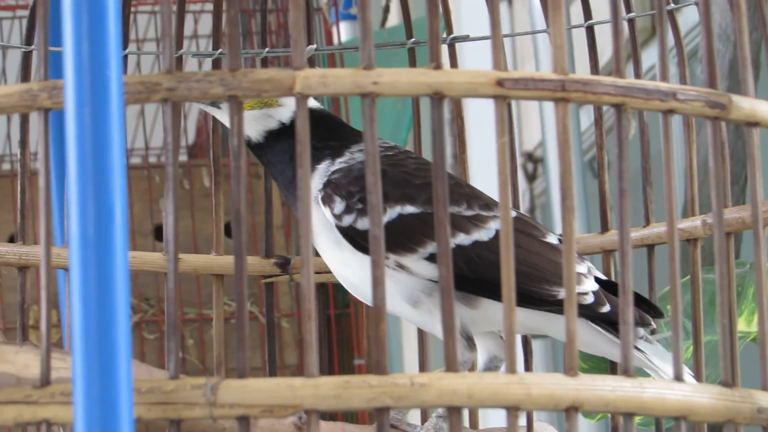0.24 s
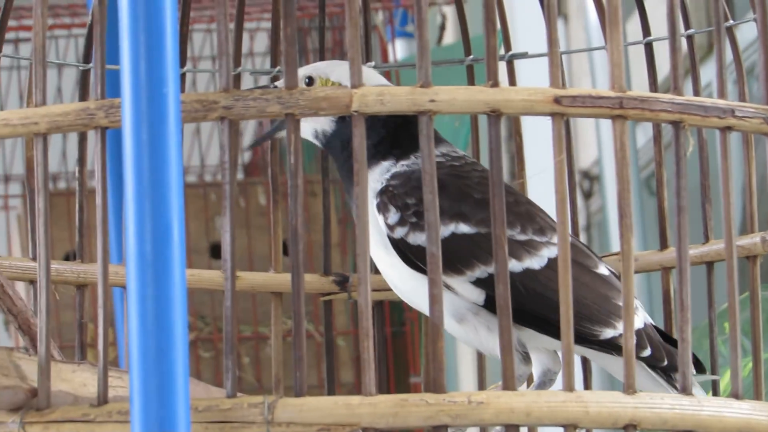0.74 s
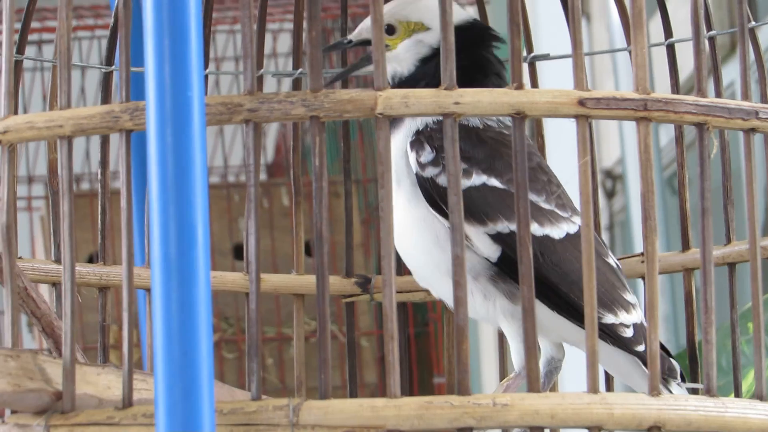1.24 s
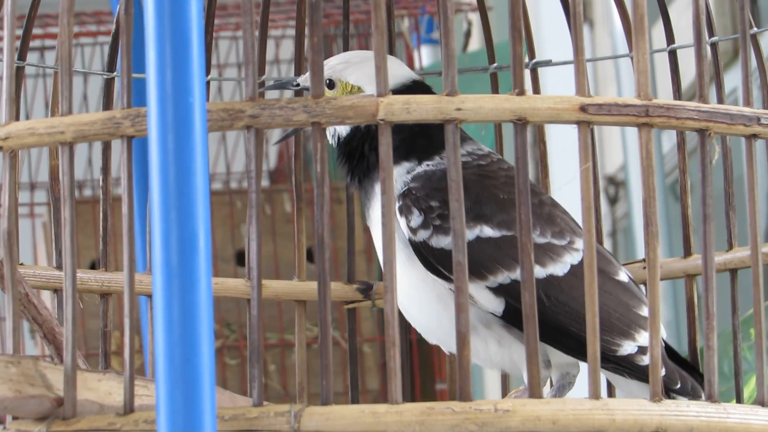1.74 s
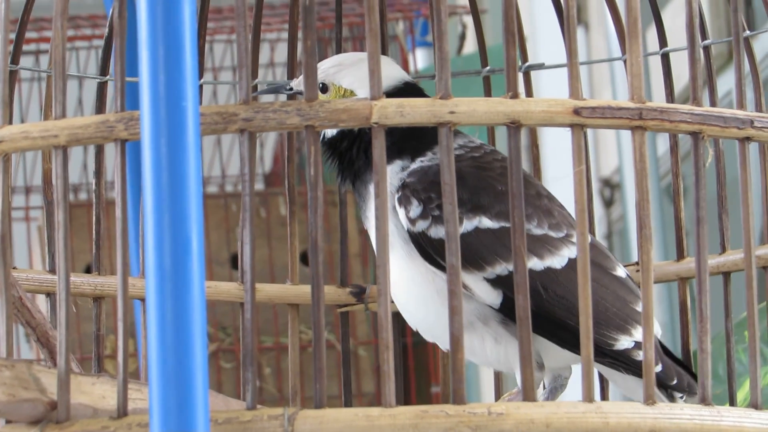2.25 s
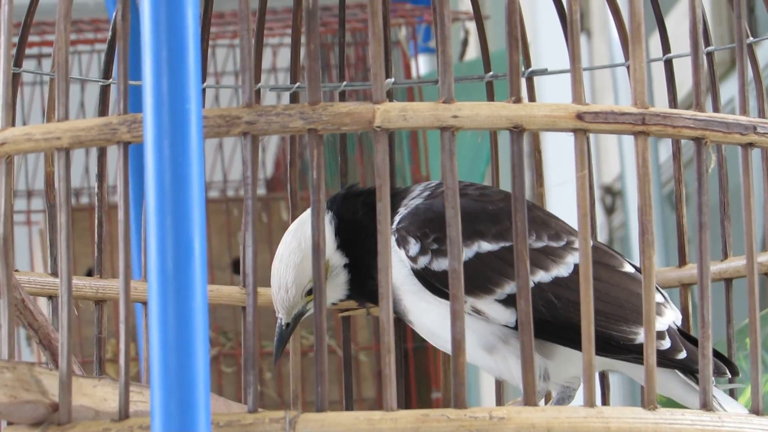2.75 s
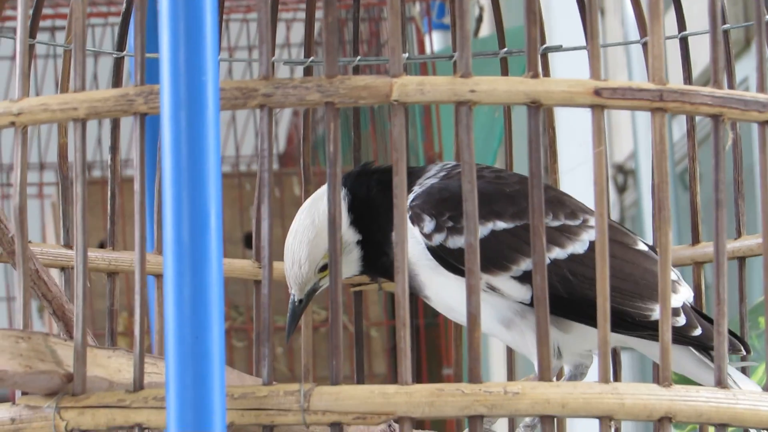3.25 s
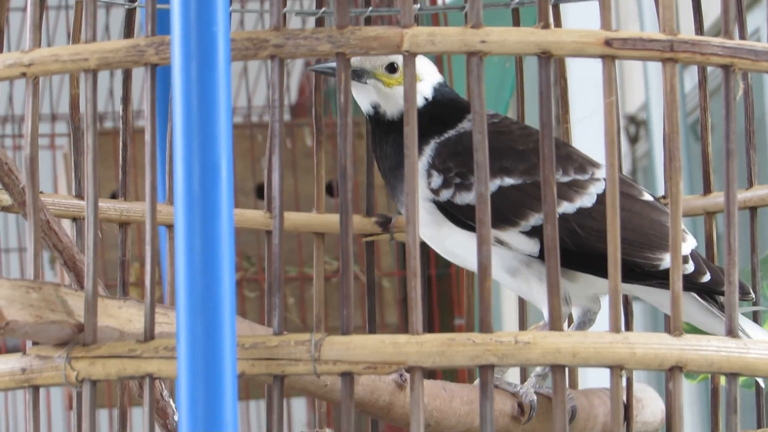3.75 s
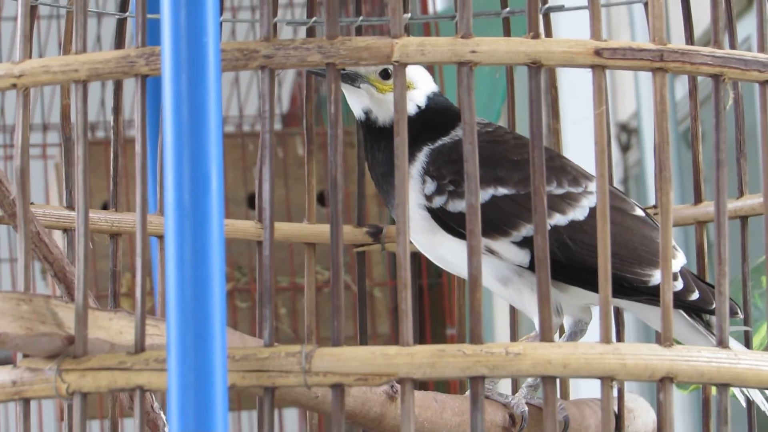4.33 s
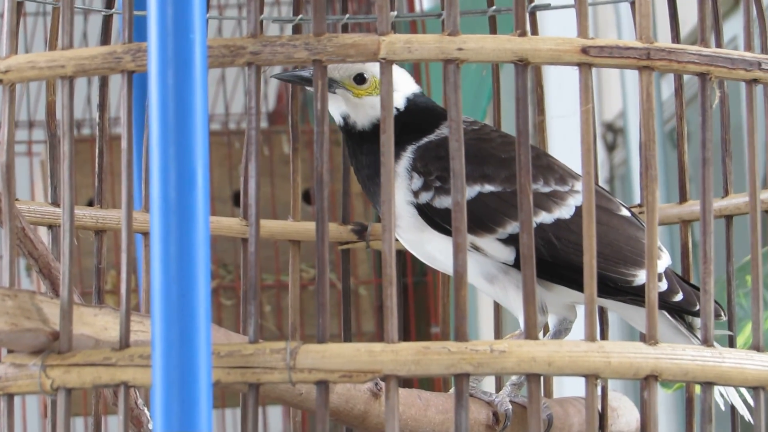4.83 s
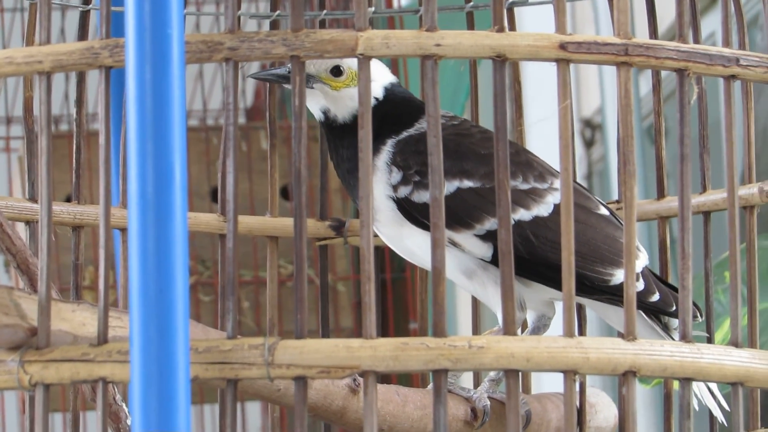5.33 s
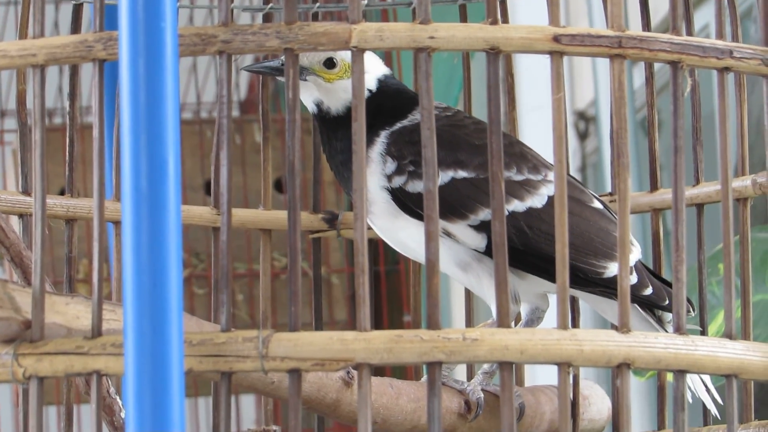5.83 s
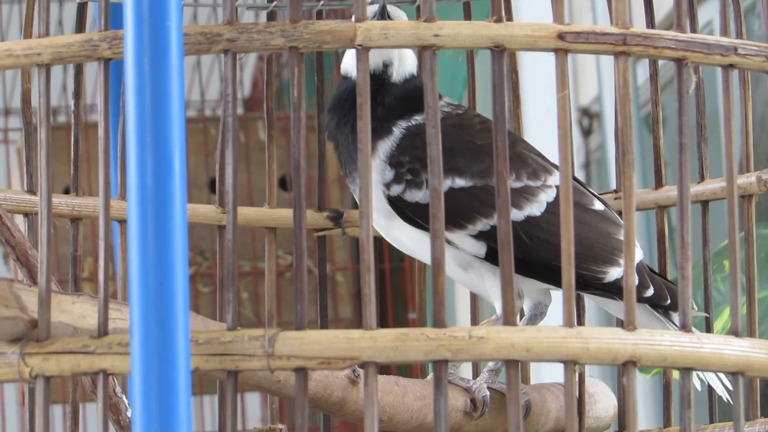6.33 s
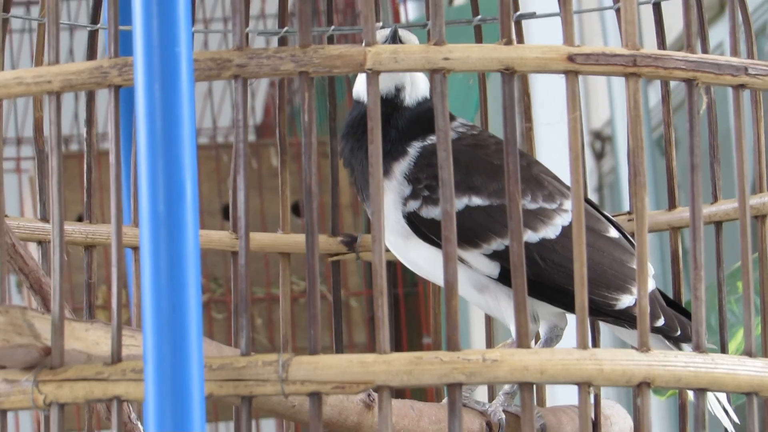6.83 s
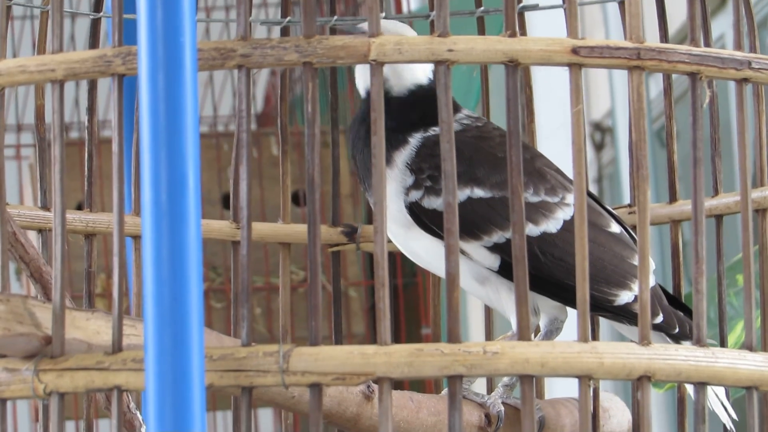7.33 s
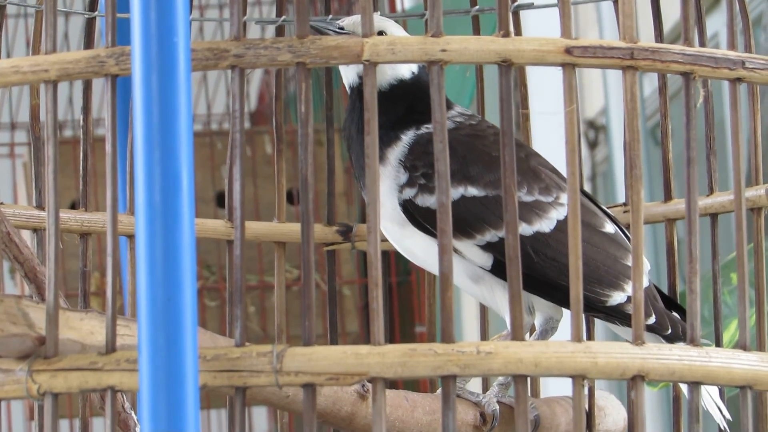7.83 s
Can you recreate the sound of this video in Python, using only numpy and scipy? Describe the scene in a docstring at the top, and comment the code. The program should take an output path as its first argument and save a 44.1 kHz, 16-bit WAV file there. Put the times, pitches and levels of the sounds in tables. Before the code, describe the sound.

A caged starling belts two loud, piercing whistle-and-squawk phrases, then scattered quiet chirps and rasps, while a low engine drone slowly swells beneath.

```python
"""A caged starling sings whistles, chirps and rasping squawks in a hard-walled, echoing place.
Each voice is a jittered harmonic series plus leaking air, heard directly and through echoes.
An engine drone of pure tone sinks in pitch and swells over a throb and a traffic-like rumble,
moan, gusts and hiss of coloured noise; a limiter ducks the bird and background after the two
loudest phrases, over steady circuit noise."""
import sys
import numpy as np
from scipy import signal
from scipy.fft import rfft, irfft, next_fast_len
from scipy.io import wavfile
from scipy.ndimage import uniform_filter1d

SR = 44100
rng = np.random.default_rng(int(sys.argv[2]) if len(sys.argv) > 2 else 0)


def to_wav(s):
    """Save 16-bit WAV."""
    ch = np.atleast_2d(s).T  # columns
    pcm = np.round(np.clip(ch, -1, 1) * 32767)  # PCM
    wavfile.write(sys.argv[1], SR, pcm.astype(np.int16))


N = 355887

# hiss spectrum: (frequency [Hz], relative density [dB per Hz])
HISS_SPECTRUM = [(880, -9.5), (1500, -6.5), (2850, -10.5), (3650, -9), (3940, -10.5), (4770, -8),
                 (11100, -8), (14700, -22)]
HISS_PATCHY_DB = 0.9


def gain_of(db):
    """Decibels to amplitude."""
    return 10 ** (np.asarray(db) / 20)


def evened(x):
    """Scales to rms 1."""
    return x / np.sqrt(np.mean(x ** 2) + 1e-20)


def read(points, hz, column=1):
    """One column of a frequency table, interpolated on a log-frequency axis."""
    table = np.transpose(points)
    return np.interp(np.log(hz + 1), np.log(table[0] + 1), table[column])


def along(points):
    """A (time, value) curve at every sample."""
    return np.interp(np.arange(N) / SR, *np.transpose(points))


def add(mix, start_s, sound):
    """Mixes a sound in at a time."""
    part = mix[round(start_s * SR):][:len(sound)]
    part += sound[:len(part)]


def wobble(size, period_s):
    """Random drift of rms 1 that changes over about period_s: white noise smoothed twice."""
    width = max(round(period_s * SR), 1)
    smooth = uniform_filter1d(rng.standard_normal(size), width)
    return evened(uniform_filter1d(smooth, width))


def pair(a, b, likeness):
    """Left and right spectra with the given correlation, from independent spectra a and b."""
    likeness = np.clip(likeness, -1, 1)[:, None]
    return np.array([a, likeness * a + np.sqrt(1 - likeness ** 2) * b])


def noise(spectrum, patchy_db):
    """Two-channel noise of rms 1: random spectra coloured, with patches drifting in time and frequency."""
    # background stereo image: (frequency [Hz], left-right likeness [-1 to 1])
    likeness = [(25, -0.8), (55, -0.11), (80, -0.95), (130, 0.92), (290, 0.75), (700, 0.72), (3000, 0.47),
                (6500, 0.46), (10000, 0.41), (14300, -0.052)]
    # background balance: (frequency [Hz], left minus right [dB])
    lean = [(60, 0), (180, .5), (540, -2), (1600, -1), (4780, 2), (14300, 0)]
    # background phase: (frequency [Hz], left lead [rad])
    lead = [(100, 0.5), (780, -.5), (2150, 0.5), (5000, -0.2), (7200, 0.5), (10000, 4.5), (14500, -2.5)]
    frames = N // 512 + 5
    hz = np.fft.rfftfreq(2048, 1 / SR)
    a, b, c, d, patches = rng.standard_normal((frames, len(hz), 5)).T
    patches = uniform_filter1d(patches, 6, 0)
    patches = evened(uniform_filter1d(patches, 14, 1))
    z = pair(a + 1j * b, c + 1j * d, read(likeness, hz))
    z *= gain_of(read(spectrum, hz)[:, None] + patchy_db * patches)
    z[0] *= (gain_of(read(lean, hz)) * np.exp(1j * read(lead, hz)))[:, None]
    return evened(signal.istft(z, nperseg=2048, noverlap=1536)[1][:, :N])


def hum(rows, waver_db, right_lead_cycles):
    """A low sine with drifting pitch and wavering level, its right side ahead in phase."""
    s, hz, db = np.transpose(rows)
    t = np.arange(N) / SR
    drifting_hz = np.interp(t, s, hz) + 0.5 * wobble(N, 0.05)
    cycles = np.cumsum(drifting_hz) / SR
    level = gain_of(np.interp(t, s, db) + waver_db * wobble(N, 0.09))
    return np.sqrt(2) * level * np.sin(2 * np.pi * (cycles + np.array([[0], [right_lead_cycles]])))


def engine_drone():
    """The engine's tone: one sine on a curve of pitch and level."""
    # drone: (time [s], pitch [Hz], level [dB])
    drone_curve = [(0, 117, -45.5), (.6, 120.5, -44), (1.3, 119.3, -30.5), (2.0, 116.4, -37),
                   (2.58, 115, -30.5), (2.85, 115, -43), (3.42, 112.9, -34.5), (3.65, 112.5, -44),
                   (3.9, 112.3, -35), (4.55, 111.4, -30.5), (5.08, 111.2, -32.5), (5.55, 110, -26),
                   (6.05, 108, -21.5), (6.7, 107.6, -15), (7.3, 106.2, -19.5), (7.64, 105.8, -16.5),
                   (7.79, 104.8, -21.5), (8.07, 105.3, -15)]
    left_minus_right_db = 1
    sides = gain_of(np.array([[0.5], [-0.5]]) * left_minus_right_db)
    return hum(drone_curve, 0.23, 0.02) * sides


def throb():
    """A lower sine that fades away."""
    # throb: (time [s], pitch [Hz], level [dB])
    throb_curve = [(0, 38.5, -34.5), (1.0, 41.5, -31.5), (1.5, 44, -31), (1.9, 43, -34),
                   (2.2, 39.24, -27.5), (2.6, 40.3, -30), (3.2, 43, -70)]
    return hum(throb_curve, 1.4, 0.018)


def rumble():
    """Traffic-like rumble: mostly low noise that swells."""
    # rumble spectrum: (frequency [Hz], relative density [dB per Hz])
    spectrum = [(32, -38), (55, -8.5), (78, -6), (112, -4.5), (133, -18.5), (156, -11), (231, -15.5),
                (286, -19.5), (591, -20), (3800, -49), (4940, -99), (8360, -120)]
    # rumble: (time [s], level [dB])
    level_db = [(0, -35), (1.3, -33), (3.0, -35), (4.6, -27.5), (5.0, -29), (6.2, -29), (6.72, -23.5),
                (7.2, -29.5), (7.75, -24.5), (8.07, -27)]
    return gain_of(along(level_db)) * noise(spectrum, patchy_db=1.5)


def hiss():
    """Distant hiss: smooth noise at a steady level."""
    return gain_of(-43.5) * noise(HISS_SPECTRUM, HISS_PATCHY_DB)


def moan():
    """A band of patchy noise, narrow enough to suggest a pitch."""
    # moan spectrum: (frequency [Hz], relative density [dB per Hz])
    spectrum = [(200, -34), (240, -6), (270, -10.5), (310, 1.5), (345, -3.5), (420, -39.5)]
    # moan: (time [s], level [dB])
    level_db = [(0, -39), (1.3, -42.5), (2.8, -47), (4.5, -37), (4.85, -55)]
    return gain_of(along(level_db)) * noise(spectrum, patchy_db=3.5)


def syrinx_voice(rows):
    """A membrane in the syrinx vibrates; irregular cycles smear the overtones, flutter and leak air."""
    # windpipe and beak resonances: (frequency [Hz], gain [dB])
    beak = [(1200, 8), (2000, 0.5), (3300, 5.5), (5000, 5), (7000, 4), (9500, 2), (12500, -6),
            (15000, -15.5)]
    s, *columns = np.transpose(rows)
    t = np.arange(s[0], s[-1], 1 / SR)
    hz, effort_db, tilt_db, rasp = (np.interp(t, s, c) for c in columns)
    rasp = abs(rasp)
    quick, slow = wobble(len(t), 0.00073), wobble(len(t), 0.00373)
    jitter = rasp * (0.78 * quick + 0.65 * slow)
    cycles = np.cumsum(hz * (1 + jitter)) / SR

    k = np.arange(1, 12)[:, None]  # harmonic number
    level = gain_of(tilt_db * np.log2(k) ** 0.65 + read(beak, k * hz)) * (k * hz < 16000)
    tone = (level * np.sin(2 * np.pi * k * cycles)).sum(0)
    tone /= np.sqrt((level ** 2).sum(0) / 2)

    air_band = signal.butter(3, [1500, 13000], "band", fs=SR, output="sos")
    air = signal.sosfilt(air_band, rng.standard_normal(len(t)))
    leak = np.minimum(14 * rasp, 1.5) * gain_of(5.0 * np.minimum(tilt_db, 0))  # bright, raspy voices hiss most
    voice = (tone + leak * air) / np.sqrt(1 + leak ** 2)

    depth = np.minimum(16 * rasp, 1.1)  # of the quick buzz
    pulsing = np.minimum(45 * rasp, 0.5) * wobble(len(t), 0.004)
    flutter = (1 + depth * wobble(len(t), 0.0012) + pulsing) / np.sqrt(1 + depth ** 2)
    attack_s, release_s = 0.011, 0.0019
    edges = np.clip(np.minimum((t - t[0]) / attack_s, (t[-1] - t) / release_s), 0, 1)
    return s[0], gain_of(effort_db) * voice * flutter * edges


def chirp(start_s, length_s, first_hz, last_hz, top_db, place, tilt_db, rasp):
    """A glide, fastest at first; effort swells to its top and sinks, and weak effort dulls the overtones."""
    rise_db, fall_db = 12, 12  # effort lost per whole chirp length before and after the top
    dulling = 0.49  # tilt dB per dB of effort lost
    bend = 0.75  # glide share = time share to this power
    rasp_start, rasp_end = 0.72, 1.357  # rasp grows through the chirp
    u = np.linspace(0, 1, num=21)
    lost_db = rise_db * np.maximum(place - u, 0) + fall_db * np.maximum(u - place, 0)
    return np.transpose([
        start_s + length_s * u,
        first_hz + (last_hz - first_hz) * u ** bend,
        top_db - lost_db,
        tilt_db - dulling * lost_db,
        rasp * (rasp_start + (rasp_end - rasp_start) * u)])


def near_surfaces(song):
    """The direct song plus delayed copies, each stronger on one side, the sides alternating."""
    # nearest surfaces: (delay [s], level [dB])
    echoes = [(.0045, -6), (.009, -2.5), (.014, -1), (.021, -16), (.029, -12.5)]
    near = np.array([song, song])
    for k, (delay_s, db) in enumerate(echoes):
        echo = gain_of(db) * song[:N - round(delay_s * SR)]
        add(near[k % 2], delay_s, echo)
        add(near[1 - k % 2], delay_s, 0.44 * echo)
    return near


def room(x):
    """Sparse echoes of random sign after a short gap, decay set by frequency, partly shared by both sides."""
    # walls: (frequency [Hz], decay time t60 [s], left-right likeness [0 to 1])
    walls = [(1500, 0.21, .85), (2940, 0.39, 0.75), (5000, 0.31, 0.8), (8000, 0.42, 0.22),
             (12700, 0.33, .45)]
    size, step = SR * 3 // 4, 20
    taps = np.zeros((2, size))
    grid = np.arange(400, size - step, step)
    at = grid + rng.integers(0, step, (2, len(grid)))
    np.put_along_axis(taps, at, rng.choice([-1., 1.], at.shape), 1)
    taps *= np.clip(np.arange(size) / SR / 0.033, 0, 1)  # echoes strengthen at first
    hz, t, z = signal.stft(taps, SR, nperseg=256)
    z = pair(*z, read(walls, hz, column=2))
    z *= gain_of(-60 * t / read(walls, hz)[:, None])
    tail = signal.istft(z, SR, nperseg=256)[1]
    tail /= np.linalg.norm(tail[0])
    return signal.fftconvolve(x[None], tail, axes=1)[:, :N]


def starling():
    """All syrinx voices, heard directly, from the nearest surfaces and from the walls."""
    # loud phrase, one table a voice; the second to fourth sound together as one harsh call:
    # (time from phrase start before stretch [s], pitch [Hz], effort [dB],
    # overtone tilt [dB at the 2nd harmonic], rasp [share of pitch jitter])
    phrase = [
        [(0, 1580, -28.5, -28, .002), (.009, 2250, -13.5, -38, .002), (.026, 2268, -3, -32.5, .002),
         (.029, 2640, -2.5, -35, .003), (.033, 2820, 0.5, -36.5, .003), (.046, 2850, -11, -34, .005)],
        [(.043, 3010, -5.5, -28, 0.062), (.077, 3454, 3, -16, 0.049), (.122, 3519, -3, -27, 0.03),
         (.19, 3465, -16, -19, 0.011)],
        [(.041, 4450, -16, -12, .05), (.085, 4590, -3.5, -13, .05), (.165, 4450, -22.5, -21, 0.048)],
        [(.043, 2427, -25, -1, 0.018), (.075, 2440, -14, 7.5, 0.02), (.13, 2444, -29.5, 7.5, 0.026)],
        [(.19, 2952, 1.5, -38, 0.028), (.213, 2680, -2.5, -24, .012), (.24, 2622, 0, -35, 0.0063),
         (.31, 2548, -7, -35, 0.0042)],
        [(.31, 3165, -2, -15.5, .0045), (.325, 3056, 5, -27.5, 0.025), (.331, 3820, -4, -14.5, 0.012),
         (.35, 3161, -0.5, -16.5, .013), (.402, 3010, -5.5, -37, .0046)],
    ]
    # each singing of the phrase: (start [s], added effort [dB], time stretch [ratio], added tilt [dB])
    sung = [(.5, 0.5, 1.0, 2.5), (1.368, 2.4, 1.042, -2)]
    # chirps and squawks: (start [s], length [s], first pitch [Hz], last pitch [Hz], top effort [dB],
    # place of the top [0-1], tilt at the top [dB at the 2nd harmonic], rasp before growth [jitter share])
    chirps = [ (0.273, 0.074, 3360, 3136, -31, 0.56, -1, 0.031),
              (0.358, 0.068, 3200, 2946, -32.5, .45, -3, 0.1),
              (1.129, 0.02, 2160, 1555, -24.5, 0, -6, 0.13),
              (1.189, 0.091, 1250, 1550, -33.5, 0.63, -10.5, 0.022),
              (1.265, 0.049, 3066, 3010, -29, 0, -3, 0.0047),
              (2.318, 0.077, 4410, 4200, -30, 0.37, 2, 0.087),
              (2.341, 0.061, 2250, 1684, -31.5, 0.48, -5.5, 0.047),
              (2.401, 0.02, 3090, 3950, -22, 0.45, -1, 0.069),
              (2.42, 0.027, 3050, 2810, -26.5, 0.44, -4, 0.014),
              (2.471, 0.04, 4250, 4950, -26, 0.56, 0.5, 0.027),
              (2.775, .035, 1520, 1490, -39, 0.17, -11, 0.025),
              (2.815, 0.091, 1335, 1362, -35, 0.9, -0.5, 0.0035),
              (2.881, 0.12, 1550, 2028, -26.5, 0.58, -3, 0.088),
              (3.202, .03, 6350, 5600, -40, .3, -8, 0.045), (3.223, 0.042, 4350, 4050, -34, 0.34, 3, 0.017),
              (3.252, .075, 2174, 1808, -31.5, 0, -3, 0.123),
              (3.307, 0.037, 3470, 3600, -37.5, 0.1, -2, .009),
              (3.402, 0.12, 1656, 1852, -30.5, 0.55, -2.5, 0.072),
              (3.794, 0.033, 2380, 2950, -33.5, 0, -4, 0.047),
              (3.82, 0.057, 2990, 2770, -43, 0.9, -13, 0.043),
              (4.008, 0.036, 4430, 4490, -28.5, .05, -6, 0.029),
              (4.021, 0.044, 5570, 5800, -23.5, 0.02, 0, 0.027),
              (4.419, 0.042, 5480, 5300, -39, .1, -12, 0.013),
              (4.601, 0.12, 2260, 2270, -25, 0.33, -1, 0.026),
              (4.708, 0.055, 1875, 1803, -26.5, 0.16, -5.5, 0.027),
              (4.857, 0.11, 2526, 3754, -21.5, 0.56, -4, 0.048),
              (4.863, 0.065, 6130, 4530, -19, .4, -2, 0.073),
              (4.959, .035, 4570, 4490, -19, 0.24, -7, 0.02), (5.151, .04, 5413, 5670, -41, .4, -12, 0.024),
              (5.283, 0.045, 6120, 5280, -33, 0, -9, 0.029),
              (5.405, 0.047, 5350, 6300, -32.5, 0.02, -16, 0.02),
              (5.549, 0.064, 5140, 6120, -35.5, 0.07, -14, 0.036),
              (5.627, .04, 2646, 3120, -25, 0.75, -2, 0.043),
              (5.658, 0.053, 3190, 4590, -23.5, 0.35, 0.5, 0.042),
              (5.7, 0.036, 1936, 1880, -27.5, 0.45, -2.5, 0.03),
              (5.761, 0.064, 4310, 4570, -27.5, 0.4, 0.5, 0.044),
              (5.788, 0.031, 1806, 1565, -28, 0.7, -6.5, 0.034),
              (5.964, 0.052, 5400, 6380, -33.5, 0, -13, 0.044),
              (6.116, 0.059, 2714, 2930, -32.5, 0.12, 0.5, 0.057),
              (6.222, 0.14, 2606, 3290, -17.5, 0.47, -1, 0.035),
              (6.359, .04, 3400, 2990, -34, 0.8, -6, 0.023),
              (6.542, 0.084, 2855, 4504, -25.5, 0.52, 1.5, 0.046),
              (6.619, .03, 2040, 1582, -28, 0.36, -3, 0.066), (7.481, 0.023, 4310, 4230, -30, 0, 5, 0.0059),
              (7.494, 0.027, 3550, 2992, -29, 0, 3, 0.029), (7.515, 0.047, 1608, 1413, -28, .7, -9, 0.016),
              (7.584, 0.037, 3700, 3070, -34.5, 0.1, 2, .016),
              (7.779, 0.037, 2607, 3000, -44, .45, -14, 0.016), ]
    song = np.zeros(N)
    for start_s, db, stretch, tilt_db in sung:
        for rows in phrase:
            moved = np.array(rows) * [stretch, 1, 1, 1, 1] + [start_s, 0, db, tilt_db, 0]
            add(song, *syrinx_voice(moved))
    for row in chirps:
        add(song, *syrinx_voice(chirp(*row)))
    heard = gain_of(-4.5) * near_surfaces(song) + gain_of(-5.5) * room(song)
    return heard * gain_of([[0.6], [-0.6]])  # left a little louder


def gusts():
    """Air buffeting the two ports, largely in opposition at the lowest frequencies."""
    # gust spectrum: (frequency [Hz], relative density [dB per Hz])
    spectrum = [(15, -40), (25, -3), (40, 10.5), (60, -5.5), (90, -38.5)]
    # gusts: (time [s], level [dB])
    level_db = [(2.6, -55), (3.2, -37.5), (4.65, -38), (4.85, -28), (5.05, -33), (6.2, -35), (8.07, -44)]
    return gain_of(along(level_db)) * noise(spectrum, patchy_db=4.0)


def scene():
    """Bird, drone, throb, rumble, hiss, moan and gusts."""
    floor = rumble() + hiss() + moan() + gusts()
    return starling() + engine_drone() + throb() + floor


def limiter(dry):
    """Pulls loud peaks down within milliseconds and lets go slowly, both sides alike."""
    threshold_db, release_db_per_s = -10, 13.24  # release of the detector
    strength = 1.11  # dB of cut per detected dB over
    power_db = 10 * np.log10(abs(uniform_filter1d((dry ** 2).mean(0), 300)) + 1e-12)
    fall_db = np.arange(N) * release_db_per_s / SR
    held_db = np.maximum.accumulate(power_db + fall_db) - fall_db
    over_db = np.maximum(held_db - threshold_db, 0)
    return dry / gain_of(strength * uniform_filter1d(over_db, 400))


def record(dry):
    """Limiter, steady circuit noise, soft rounding of peaks, response dips and a band limit."""
    # narrow response dips: (frequency [Hz], half-width [Hz], depth [0-1])
    dips = [(3930, 100, .85), (7850, 45, .9)]
    edge_hz = 14450
    ducked = limiter(dry)
    noisy = ducked + gain_of(-57.5) * noise(HISS_SPECTRUM, HISS_PATCHY_DB)  # circuit noise is not ducked
    rounded = 1.15 * np.tanh(noisy / 1.15)  # adds odd overtones to the loudest whistles
    size = next_fast_len(N + 4096)
    hz = np.fft.rfftfreq(size, 1 / SR)
    colour = np.ones(len(hz))
    for f, width_hz, depth in dips:
        colour *= 1 - np.clip(depth, 0, 1) / (1 + ((hz - f) / width_hz) ** 2)
    dipped = irfft(rfft(rounded, size) * colour, size)[:, :N]
    lowpass = signal.firwin(767, edge_hz, window=("kaiser", 11), fs=SR)
    return signal.oaconvolve(dipped, lowpass[None], "same")


dry = scene()
out = record(dry)
to_wav(out)
```